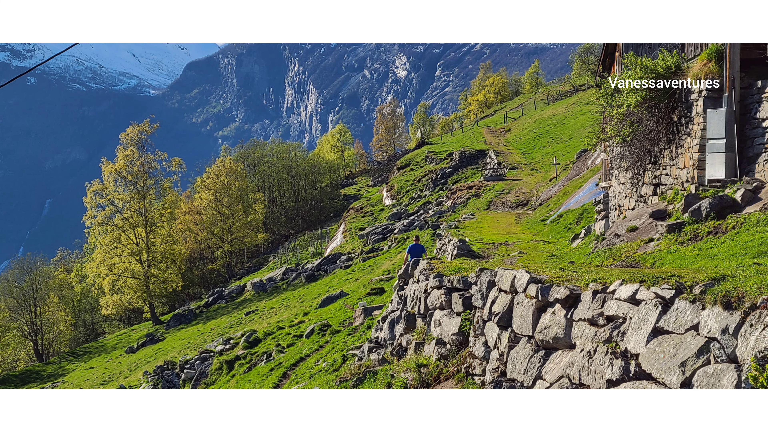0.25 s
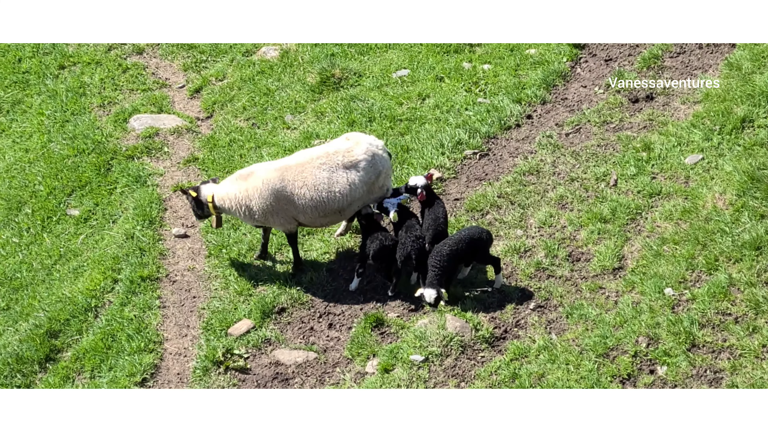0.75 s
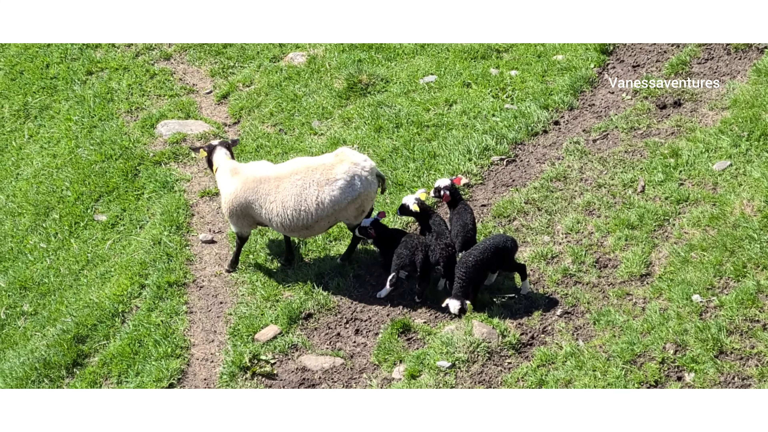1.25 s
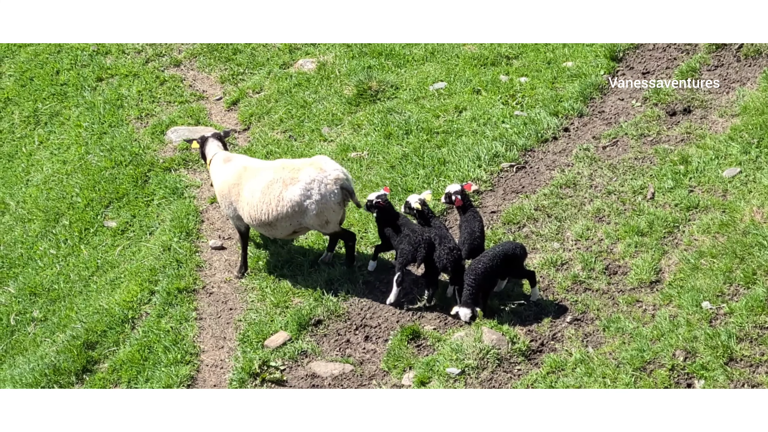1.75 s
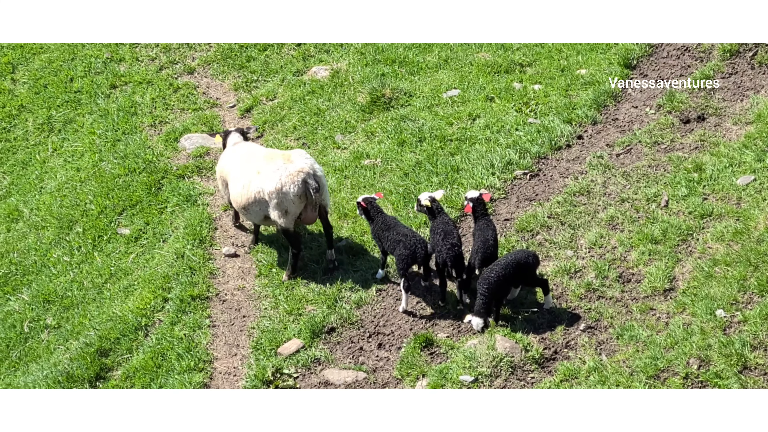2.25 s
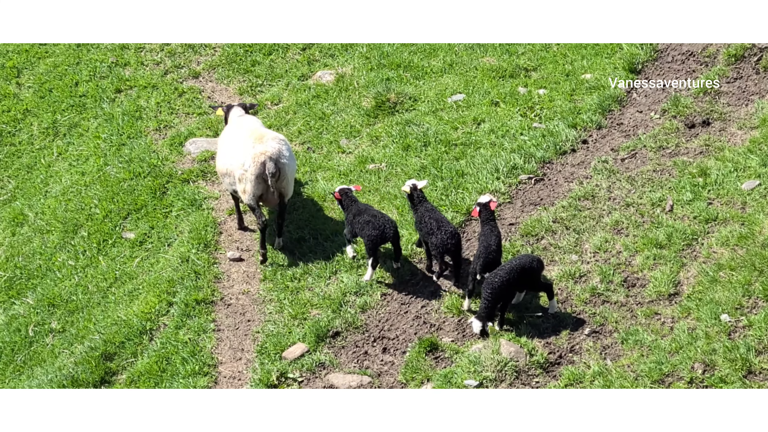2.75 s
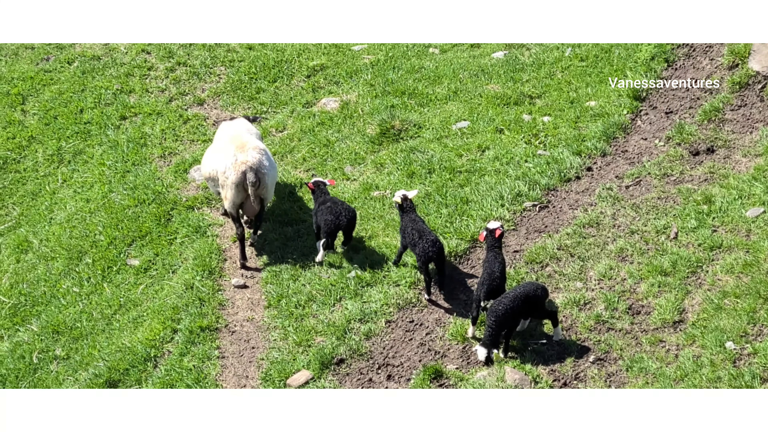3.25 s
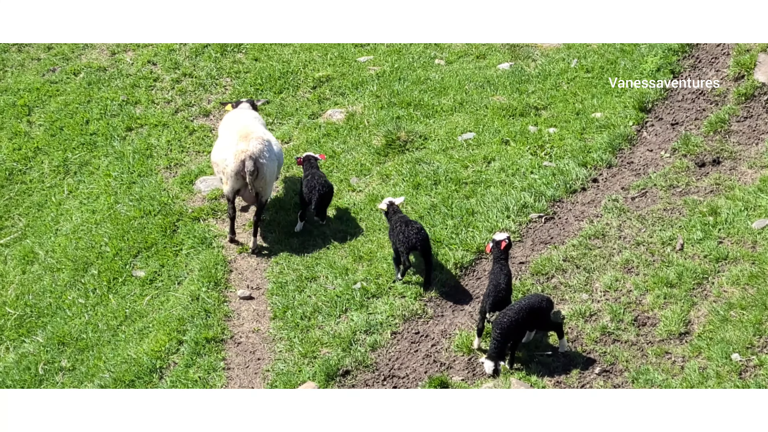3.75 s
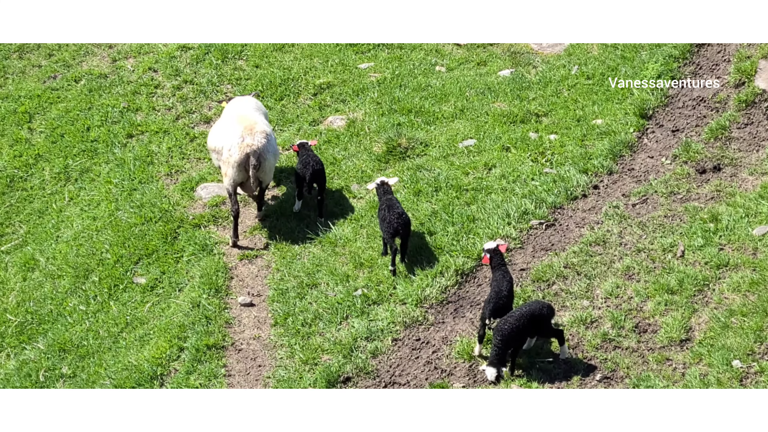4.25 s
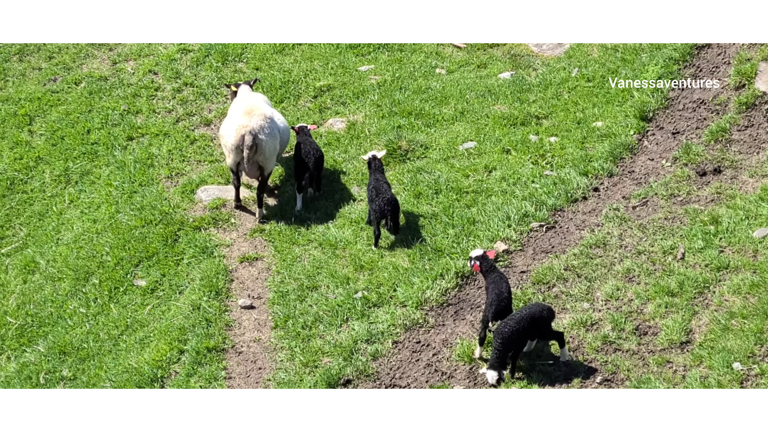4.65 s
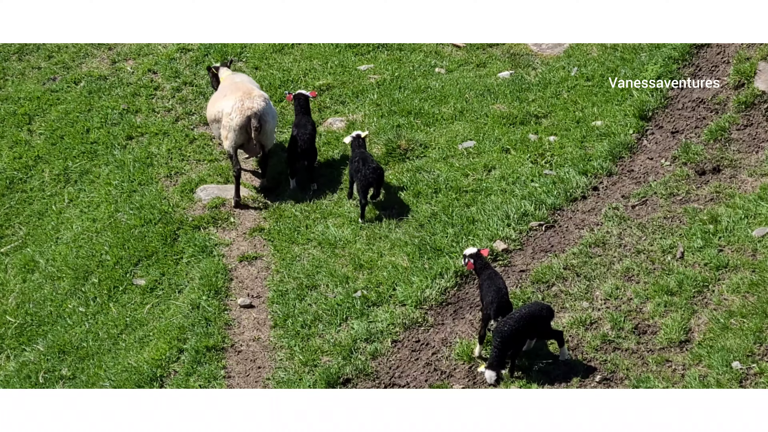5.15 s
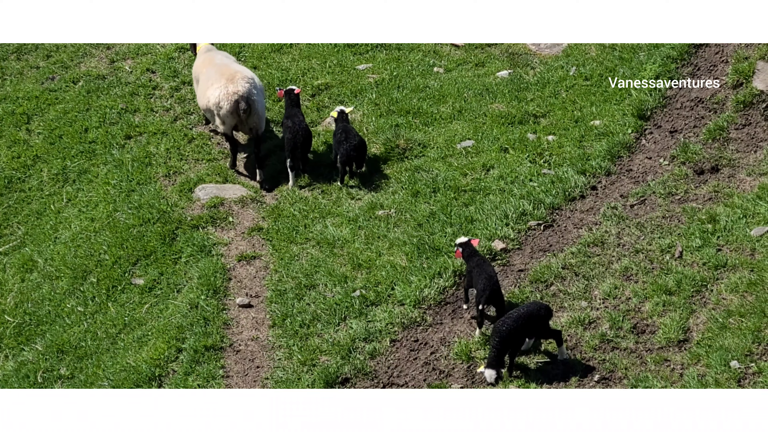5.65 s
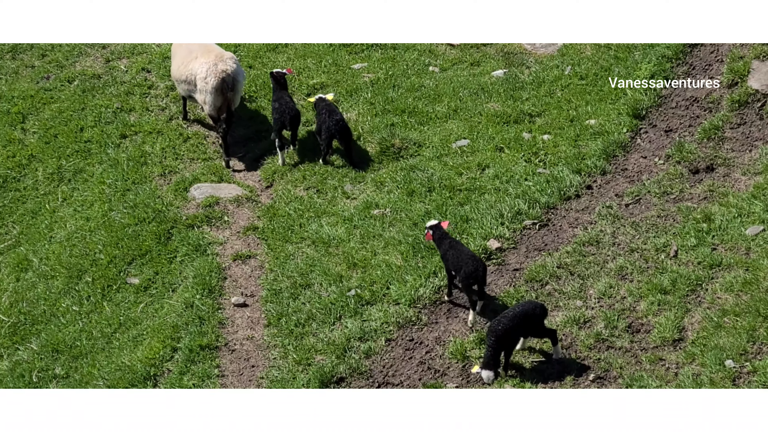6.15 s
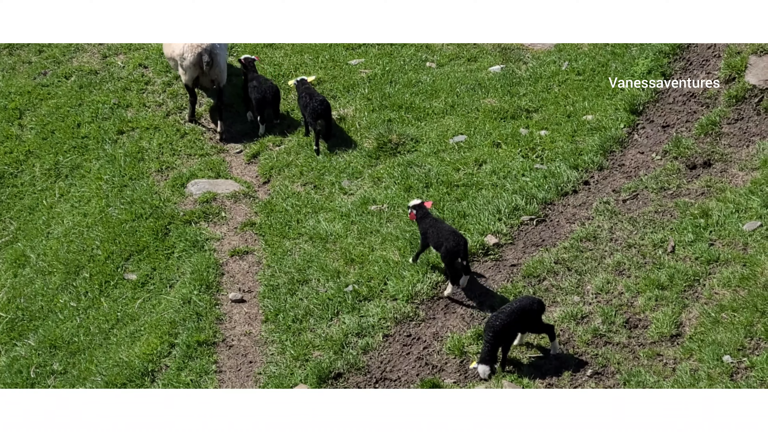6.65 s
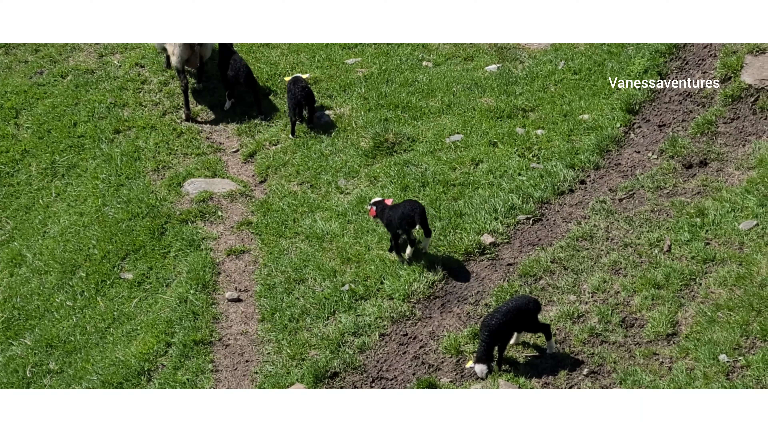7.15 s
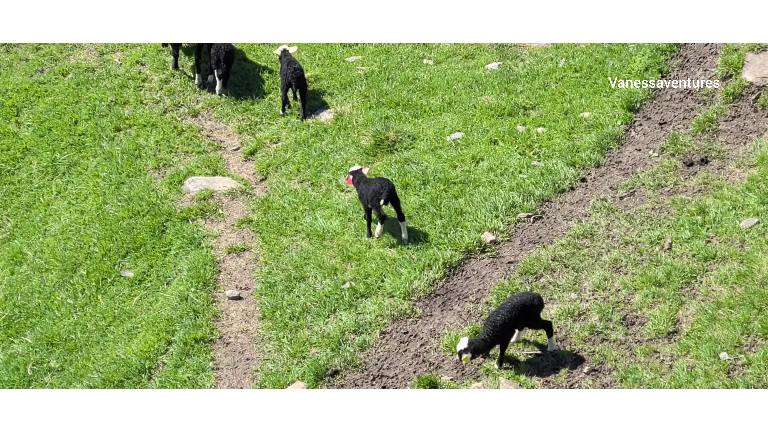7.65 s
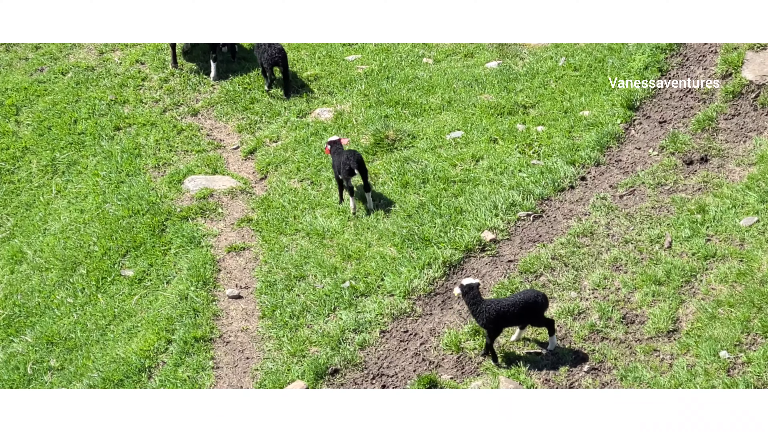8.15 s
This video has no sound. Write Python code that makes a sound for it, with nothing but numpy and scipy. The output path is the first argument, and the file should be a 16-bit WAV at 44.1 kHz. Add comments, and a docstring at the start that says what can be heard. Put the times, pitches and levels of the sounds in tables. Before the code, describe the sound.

Dull, short tin clanks from a walking ewe's collar, uneven in strength, over steady far water, rumbling wind and tiny grass ticks.

```python
"""Mountain pasture: a ewe walks, and the tin bell on her collar clanks at each jolt, as a sum of decaying modes.
Distant falling water roars in the valley, as noise shaped by spectra; a low hum wavers, as narrow-band noise.
Wind buffets the microphones as low noise of uneven strength, and they hiss thinly, as shaped high noise.
Grass ticks and rustles as short puffs of noise. Faint whistles, some perhaps birds, one probably the bell
still ringing, are sines of gliding pitch. The sound is cut in after a short silence."""
import sys
import numpy as np
from scipy import signal
from scipy.fft import rfft, irfft
from scipy.io import wavfile
from scipy.ndimage import uniform_filter1d

SR = 44100
rng = np.random.default_rng(int(sys.argv[2]) if len(sys.argv) > 2 else 0)


def digitize_waveform(pressure):
    """Quantize a signal to 16-bit integers and store it at the path in sys.argv[1].

    Rows of a 2-D input are taken as channels; values are limited to [-1, 1].
    """
    field = np.atleast_2d(pressure).T
    bounded = np.clip(field, -1, 1)
    quanta = np.round(bounded * 32767).astype(np.int16)
    wavfile.write(sys.argv[1], SR, quanta)


N = 370440
SLOW_STEP = 64  # samples between points of a slow curve
START_S, EDGE_HZ = 0.4336, 15850  # end of the opening silence, upper band limit

# Thin hiss of the microphones, relative spectral density: hz, level_db
HISS_SPECTRUM = [(2350, -36.5), (4000, -7.5), (5040, -6.5), (5700, -4), (6820, 4), (7660, -7.5),
                 (8070, -26.5), (8500, -24.5), (10000, -14.5), (12500, -10.5), (15200, -13), (16000, -16.5)]
# Roar of the water, relative spectral density: hz, level_db
ROAR_SPECTRUM = [(53, -38.5), (90, -3.5), (145, -13), (225, -7), (283, -10), (356, -9), (631, -14),
                 (743, -12.5), (1160, -18), (1410, -28), (2080, -25.5), (3090, -39.5), (4500, -51),
                 (5850, -77), (9900, -120)]
# Middle band of the roar that surges, relative spectrum: hz, level_db
SURGE_SPECTRUM = [(300, -60), (600, -18), (1100, 0), (1380, -4), (1640, 1), (1950, -2), (2250, -10),
                  (2700, -8), (3200, -20), (4500, -36), (7000, -90)]
# Swells of that band as the air carries it: peak_s, level_db, rise_and_fall_s
SURGE_SWELLS = [(1.7, -60.5, 0.77), (5.04, -55, 0.2), (5.69, -49, .06), (5.88, -48, .14), (6.55, -59, .25),
                (7.63, -57.5, 0.23)]
ROAR_DB, HISS_DB, CALM_DB = -40.5, -72, -63  # rms levels; the last is the surging band between swells
# Left-right likeness of the roar: hz, likeness (0-1)
ROAR_LIKENESS = [(100, 1), (270, 0.93), (600, 0.55), (1200, 0.49), (2500, 0.51), (4000, 0), (8000, 0.14)]
# Phase by which the left leads in the roar: hz, left_lead_rad
ROAR_LEAD = [(20, -2.5), (780, 1.5), (2410, 6), (4050, 11.5)]
# Left-right level difference of the noise fields: hz, left_over_right_db
FIELD_BALANCE = [(60, 3), (110, -2.5), (200, 1), (380, -2), (700, 0.5), (1290, -2), (2380, -2.5),
                 (4400, -2), (8120, 5.5), (15000, -6.5)]

DRONE_HZ, DRONE_WIDTH_HZ = 86.5, 6  # centre, full width at half amplitude
DRONE_DB, DRONE_LIKENESS = -46.5, 0.8  # rms level, left-right likeness (0-1)

# Wind strength before lumps and gusts: time_s, level_db
WIND_STRENGTH = [(0.44, -46), (0.75, -41), (0.9, -36), (1.4, -35.5), (1.9, -35.5), (2.75, -33), (2.87, -42),
                 (3.1, -36.5), (3.6, -36.5), (3.72, -37.5), (4.2, -33.5), (4.4, -44), (5.1, -41),
                 (5.5, -46.5), (5.8, -42), (6.4, -44), (7.2, -42), (8.4, -46)]
# Pressure swings of the wind, relative spectral density: hz, level_db
WIND_SPECTRUM = [(8.8, -61.5), (15, -11), (43, 1), (70, 4.5), (93, 0), (134, -13.5), (200, -14), (260, -40),
                 (440, -120)]
# Hardest gusts, and one brief dip: peak_s, change_db, rise_and_fall_s, left_over_right_db
WIND_GUSTS = [(1.3, -4, .04, 9), (1.44, 4, 0.044, -3), (1.73, 5, .03, 6), (2.12, 3, 0.047, -0.5),
              (2.32, 4.5, 0.029, -3), (3.56, 7, 0.032, 9), (3.76, 8, .04, 9), (3.96, 6.5, 0.11, 8.5),
              (4.63, 9, .04, 3), (5.1, 5.5, 0.069, 10), (6.6, 11.5, 0.032, 5)]
LUMPS_DB, SLOWEST_LUMP_HZ, FASTEST_LUMP_HZ = 1.5, 0.8, 7.6  # rms depth, range of rates

# Ticks and rustles in the grass: time_s, relative level_db, centre_hz, decay_s
GRASS_RUSTLES = [(0.613, -59, 4600, 0.004), (0.815, -71, 8000, 0.0047), (0.834, -66, 8000, 0.0036),
                 (.901, -65, 11000, .004), (0.981, -58, 11000, 0.0061), (1.075, -65, 12500, .04),
                 (1.146, -63, 11000, 0.0032), (1.907, -74, 12000, .09), (2.36, -66, 12000, 0.071),
                 (2.633, -63, 11000, 0.0019), (2.887, -74, 10000, 0.018), (3.742, -68, 10000, .004),
                 (4.353, -65, 12000, .003), (4.688, -60, 9000, 0.019), (5.445, -69, 4000, .005),
                 (8.2, -76, 4000, 0.009)]

# One longer bird call that arches and drops: time_s, pitch_hz, level_db, breathiness (0-1)
BIRD_CHIRP = [(3.446, 5300, -76, .3), (3.455, 5650, -68, .5), (3.49, 6040, -69, .8), (3.55, 5500, -69, .5),
              (3.57, 4500, -69, .1), (3.6, 3100, -77, .1)]
# Short whistles, some perhaps birds, the one at 6.5 s probably the bell still ringing:
# start_s, length_s, start_hz, middle_hz, end_hz, level_db, breathiness (0-1)
FAINT_WHISTLES = [(3.31, .05, 3040, 3480, 2950, -72, .1), (3.44, .04, 3390, 3420, 3440, -70, .1),
                  (3.478, .028, 3200, 3240, 3360, -70, .1), (3.6, .045, 3380, 3350, 3300, -72, .1),
                  (5.64, .1, 1105, 1070, 1075, -51, .7), (6.5, .26, 2572, 2582, 2575, -63, .03),
                  (6.728, .035, 3180, 3180, 3120, -63, .05), (6.885, .045, 5840, 5878, 5910, -72, .05),
                  (7.028, .04, 5830, 5835, 5860, -76, .03)]
WHISTLE_FADE_S = 0.012  # fade in and fade out

# Blows of the clapper: time_s, lowest_tone_db, upper_tones_db, brightness_db_per_octave, place_round_rim_rad,
# bell_facing_rad, relative clack_db, swing_rad_per_s, fade_time_s
BELL_BLOWS = [(1.5333, -24, 5.7, 4.2, 0.01, 2.22, 5, 2.2, 0.088),
              (1.692, -35.5, 2, -8, 2.97, 4.52, 6, 3, 0.06),
              (2.1229, -16, 3.1, -0.2, 0.56, 4.23, 1, 1.9, 0.055),
              (3.0102, -15.3, 5.6, -0.5, 4.82, 1.39, 2, 0.2, 0.089),
              (3.8905, -20.5, 2.6, -3, 1.0, 5.87, -2, 4.4, 0.132),
              (4.7098, -16, -5.7, 7.4, 3.57, 5.65, -2, -0.8, 0.12),
              (4.8646, -16, -6.7, -1.5, 6.08, 1.21, -5, -0.2, 0.131),
              (5.7524, -14, 1.9, -3.2, 1.35, 4.68, 0, 0.4, 0.092),
              (6.2817, -28, 9.5, -1.5, 0.64, 4.45, 2, -0.5, 0.095),
              (6.6709, -20.5, -4.3, 0.4, 2.2, 1.83, 4, 4.2, 0.138),
              (7.1721, -26.5, -8.1, 3.9, 5.35, 4.93, -4, -0.2, 0.096),
              (7.7224, -18.5, -4.5, -2.3, 2.19, 0.14, 1, -1.0, 0.07),
              (7.8643, -33, -2.8, -3.5, 0.0, 1.99, -2, -0.2, 0.107),
              (8.316, -18.5, 2.6, 2.5, 0.11, 2.03, -2, 0.2, 0.075)]
# Lowest tone of the bell: pitch_hz, swell_s, t60_s, left_over_right_db, left_lead_rad
LOWEST_TONE = (1208, 0.0097, 0.087, 5.4, 1.06)
# Upper tones of the bell: pitch_hz, level_under_lowest_tone_db, t60_s, waves_round_rim, node_phase_rad,
# beams_radiated, null_phase_rad, left_over_right_db, left_lead_rad
UPPER_TONES = [(2083, -21.7, 0.45, 1, 0.3, 1, 0.72, 1.0, -2.8),
               (2565, -25.4, 0.28, 4, 0.48, 1, 0.84, -2.0, -1.4),
               (3009, -23.8, 0.29, 4, 0.78, 4, 0.6, -1.0, -2.3),
               (3165, -29.2, 0.13, 5, 0.6, 1, 0.96, -4.0, -0.3),
               (3243, -24.2, 0.17, 4, 2.58, 5, 0.9, -1.0, -0.1),
               (3461, -36.2, 0.13, 4, 0.3, 3, 1.26, -3.0, 1.3),
               (4040, -27.6, 0.36, 4, 2.7, 3, 1.8, 4.0, 1.1),
               (4217, -24.7, 0.36, 4, 2.28, 5, 0.9, 6.0, -2.0),
               (4605, -27.9, 0.14, 4, 0.54, 4, 0.54, -1.0, -0.2),
               (5122, -36.1, 0.43, 3, 1.38, 1, 0.84, -11.0, -2.6),
               (5275, -22.5, 0.3, 4, 2.0, 1, 2.58, -10.0, -3.0),
               (5469, -36.1, 0.19, 3, 1.02, 4, 2.7, -1.0, -1.0),
               (5908, -31.5, 0.14, 1, 0.06, 1, 0.84, 1.0, -3.0),
               (6285, -30.2, 0.14, 5, 2.04, 3, 0.6, 1.0, -2.9),
               (6675, -27.3, 0.21, 3, 0.24, 3, 1.62, -2.0, -2.1),
               (7027, -30.1, 0.2, 2, 0.12, 2, 3.06, 6.0, -1.4),
               (7205, -37.8, 0.13, 1, 0.06, 1, 1.14, 5.0, -1.9),
               (7307, -41.2, 0.37, 4, 1.26, 1, 0.6, 6.0, -1.8),
               (8072, -46.8, 0.18, 3, 1.56, 2, 2.88, 11.0, -1.2),
               (8610, -43.6, 0.1, 5, 1.2, 5, 1.56, 12.0, 2.0),
               (8941, -29.8, 0.08, 3, 1.74, 3, 1.32, 3.0, 1.7),
               (9275, -35.3, 0.16, 3, 0.84, 5, 1.62, 7.0, 2.7),
               (9671, -33.1, 0.12, 3, 2.58, 3, 3.12, 6.0, 2.4),
               (10004, -31.2, 0.16, 2, 0.72, 1, 3.0, 9.0, 2.9),
               (10405, -37.3, 0.15, 4, 2.76, 1, 2.88, 10.0, -0.1),
               (10680, -36.5, 0.14, 5, 2.88, 1, 2.64, 12.0, -0.6),
               (10909, -34.1, 0.14, 2, 2.76, 3, 0.66, 5.0, -2.4),
               (11614, -42.3, 0.18, 4, 0.42, 4, 0.48, -0.0, 0.7),
               (12160, -30.4, 0.1, 4, 0.48, 4, 0.6, -3.0, 2.1),
               (13549, -39.0, 0.11, 3, 0.48, 1, 0.9, -6.0, -2.8),
               (14591, -43.1, 0.12, 5, 1.14, 2, 3.12, -0.0, -1.3),
               (15382, -36.9, 0.12, 3, 1.56, 3, 0.48, 1.0, -0.1)]
# Noise of the clack, relative spectrum: hz, level_db
CLACK_SPECTRUM = [(2000, -27), (3200, 13), (4500, -17), (7000, 4.5), (9000, -18.5), (12500, -19),
                  (15500, -5)]
# Crowd of close, short tones at the top of the tin, relative strength: hz, level_db
CLATTER_SPECTRUM = [(2800, -47), (3300, -43.5), (5000, -65), (7200, -43), (8300, -50.5), (10000, -55.5),
                    (12300, -43), (14000, -53.5), (15500, -49)]
# Upper tones waver in strength, each at a chance rate: depth, range of rates
WAVER_DB, SLOWEST_WAVER_HZ, FASTEST_WAVER_HZ = 3.5, 8, 40

LEFT_RIGHT = np.array([[0.5], [-0.5]])  # shares a difference equally between the channels


def gain_of(db):
    """Logarithmic level: decibels become an amplitude factor."""
    return 10 ** (np.asarray(db) / 20)


def evened(x):
    """Normalization: scale to a root-mean-square of one."""
    return x / np.sqrt(np.mean(x ** 2) + 1e-20)


def read(points, hz):
    """Interpolation of a spectrum along a logarithmic frequency axis."""
    f, value = np.transpose(points)
    return np.interp(np.log(hz + 1), np.log(f + 1), value)


def add(mix, s, sound):
    """Superposition: add a two-channel sound to the mix at time s."""
    part = mix[:, round(s * SR):][:, :sound.shape[1]]
    part += sound[:, :part.shape[1]]


def coloured(x, spectrum):
    """Linear filtering: multiply the Fourier spectrum by a gain curve."""
    hz = np.fft.rfftfreq(x.shape[-1], 1 / SR)
    return irfft(rfft(x) * gain_of(read(spectrum, hz)), x.shape[-1])


def slow_times():
    """Coarse sampling: the times in seconds at which slow curves are computed."""
    return np.arange(0, N, SLOW_STEP) / SR


def bump(peak_s, width_s):
    """Gaussian envelope: a smooth rise and fall of height one."""
    return np.exp(-((slow_times() - peak_s) / width_s) ** 2)


def filled(slow):
    """Sample and hold: spread a slow curve over every sample."""
    return np.repeat(slow, SLOW_STEP, axis=-1)[..., :N]


def field(size, spectrum, likeness, lead=0, patchy_db=1.0):
    """Partial coherence: two-channel noise, of rms one, from random short-time spectra that share a component."""
    hop = size // 4
    frames = N // hop + 5
    hz = np.fft.rfftfreq(size, 1 / SR)[:, None]
    a, b, c, d, patches = rng.standard_normal((frames, len(hz), 5)).T
    # patches: smooth level changes over frequency, then over time
    patches = uniform_filter1d(patches, size=10, axis=0)
    patches = evened(uniform_filter1d(patches, size=12, axis=1))
    same = np.clip(likeness, 0, 1)
    left, own = a + 1j * b, c + 1j * d
    right = same * left * np.exp(-1j * lead) + np.sqrt(1 - same ** 2) * own
    tilt = gain_of(read(FIELD_BALANCE, hz) / 2)
    cells = np.array([left * tilt, right / tilt]) * gain_of(read(spectrum, hz) + patchy_db * patches)
    return evened(signal.istft(cells, nperseg=size, noverlap=size - hop)[1][:, :N])


def microphone_hiss():
    """Shaped noise, weakly coherent: a thin high hiss, mostly unlike in the two microphones."""
    return gain_of(HISS_DB) * field(512, HISS_SPECTRUM, 0.16, patchy_db=1.5)


def water():
    """Broadband noise: a steady far roar of water and a middle band that surges."""
    hz = np.fft.rfftfreq(1024, 1 / SR)[:, None]
    likeness, lead = read(ROAR_LIKENESS, hz), read(ROAR_LEAD, hz)
    roar = field(1024, ROAR_SPECTRUM, likeness, lead, patchy_db=0.53)
    surge = field(1024, SURGE_SPECTRUM, likeness, lead, patchy_db=1.5)
    surge_level = gain_of(CALM_DB)
    surge_level = surge_level + sum(gain_of(db) * bump(s, width) for s, db, width in SURGE_SWELLS)
    return gain_of(ROAR_DB) * roar + filled(surge_level) * surge


def drone():
    """Narrow-band noise: a very narrow resonance curve turns noise into a hum that wavers."""
    hz = np.fft.rfftfreq(N, 1 / SR)
    shared, own = rng.standard_normal((N, 2)).T
    right = DRONE_LIKENESS * shared + np.sqrt(1 - DRONE_LIKENESS ** 2) * own
    resonance = 1 / (1 + (2 * (hz - DRONE_HZ) / DRONE_WIDTH_HZ) ** 2)
    hum = irfft(rfft(np.array([shared, right])) * resonance, N)
    return gain_of(DRONE_DB) * evened(hum)


def wind():
    """Amplitude-modulated low noise: lumpy pressure swings, partly shared by the two microphones, with gusts."""
    swings = field(4096, WIND_SPECTRUM, 0.31, patchy_db=2.06)
    t = slow_times()
    rate = np.geomspace(SLOWEST_LUMP_HZ, FASTEST_LUMP_HZ, 24)[:, None]
    turn = rng.random((2, 24, 1))
    # slower lumps are the stronger ones, and each channel has its own phases
    lumps = evened((np.sin(2 * np.pi * (rate * t + turn)) / np.sqrt(rate)).sum(1))
    db = np.interp(t, *np.transpose(WIND_STRENGTH)) + LUMPS_DB * lumps
    for s, gust_db, width, pan_db in WIND_GUSTS:
        db = db + (gust_db + LEFT_RIGHT * pan_db) * bump(s, width)
    return swings * filled(gain_of(db))


def rustle(db, hz, decay):
    """Impulsive friction noise: a short broad puff as blades snap or brush."""
    t = np.arange(SR // 6) / SR
    band = [(hz / 4.6, -15), (hz, 0), (hz * 4.1, -5)]  # hz, relative level_db
    puff = evened(coloured(rng.standard_normal((2, len(t))), band))
    envelope = (1 - np.exp(-5 * t / decay)) * np.exp(-(t / decay) ** 2)
    return gain_of(db + 0.5) * puff * envelope


def arch(s, length, start_hz, middle_hz, end_hz, db, breathy):
    """Piecewise-linear glide: a short whistle passes three pitches at one strength."""
    glide = ((0, start_hz), (0.5, middle_hz), (1, end_hz))
    return [(s + part * length, hz, db, breathy) for part, hz in glide]


def whistle(rows):
    """Frequency modulation: a sine whose pitch is shaken by noise as it grows breathy."""
    s, *columns = np.transpose(rows)
    t = np.arange(s[0], s[-1], 1 / SR)
    hz, db, breathy = (np.interp(t, s, c) for c in columns)
    shake = evened(uniform_filter1d(rng.standard_normal((2, len(t))), size=60))
    pitch = hz * (1 + 0.061 * breathy * shake)
    tone = np.sin(2 * np.pi * np.cumsum(pitch, axis=1) / SR)
    fades = signal.windows.tukey(len(t), min(1, WHISTLE_FADE_S * 2 / (s[-1] - s[0])))
    return np.sqrt(2) * gain_of(db) * tone * fades  # a sine's peak is root two times its rms


def lobes(count, angle, phase):
    """Standing wave: strength of a pattern of lobes at an angle, never quite nil."""
    return np.sqrt(np.cos(count * angle + phase) ** 2 + 0.01)


def lowest_tone(t):
    """Resonant build-up: the tone swells as the air in the mouth of the bell takes it up, then decays."""
    hz, swell, t60, pan_db, lead = LOWEST_TONE
    ring = (1 - np.exp(-t / swell)) * gain_of(-60 * t / t60)
    balance = gain_of(LEFT_RIGHT * pan_db) / gain_of(pan_db / 2)  # left at full level
    return balance * ring / ring.max() * np.sin(2 * np.pi * hz * t + lead * LEFT_RIGHT)


def upper_tones(t, upper_db, bright_db, place, facing, swing, fade_s):
    """Modal excitation and directivity: the place of the blow and the turn of the bell weight each decaying mode."""
    hz, tone_db, t60, waves, node, beams, null, pan_db, lead = np.transpose(UPPER_TONES)[:, :, None]
    # a tone is weak when struck near its node, or when a null of its beams points at the microphones
    share = lobes(waves, place, node) * lobes(beams, facing + swing * t, null)
    level = share * gain_of(tone_db + upper_db + bright_db * np.log2(hz / 4000) - 60 * t / t60)
    level *= np.exp(-(t / fade_s) ** 2)  # the ringing holds, then drops away ever faster
    rate, start = rng.random((len(UPPER_TONES), 2)).T[:, :, None]
    waver_hz = np.interp(rate, (0, 1), (SLOWEST_WAVER_HZ, FASTEST_WAVER_HZ))
    level *= gain_of(WAVER_DB * np.sin(2 * np.pi * (waver_hz * t + start)))
    turn = 2 * np.pi * (hz * t + rng.random((len(UPPER_TONES), 1)))
    return np.array([(level * gain_of(sign * pan_db) * np.sin(turn + sign * lead)).sum(0)
                     for sign in (0.5, -0.5)])


def clatter(t, db, count=70):
    """High modal density: many short tones of chance pitch and strength, unlike at the two microphones."""
    place, size, left, right, pan = rng.random((count, 5)).T[:, :, None]
    hz = 2800 + 12900 * place
    fade = np.hanning(2 * len(t))[len(t):]
    ring = gain_of(read(CLATTER_SPECTRUM, hz) + db - 28 * size - 60 * t / 0.25) * fade
    return np.array([(ring * lean * np.sin(2 * np.pi * (hz * t + turn))).sum(0)
                     for turn, lean in ((left, pan), (right, 1 - pan))])


def clank(db, upper_db, bright_db, place, facing, clack_db, swing, fade_s):
    """Impact excitation: one blow sounds the lowest tone, the upper tones, a noisy clack and a clatter."""
    t = np.arange(SR // 5) / SR
    onset = 1 - np.exp(-t / 0.0026)
    out = lowest_tone(t)
    out += onset * upper_tones(t, upper_db, bright_db, place, facing, swing, fade_s)
    clack = evened(coloured(rng.standard_normal((2, len(t))), CLACK_SPECTRUM))
    out += onset * clack * gain_of(clack_db - 24.5 - 60 * t / 0.058)
    short = 5000  # samples of clatter
    out[:, :short] += onset[:short] * clatter(t[:short], upper_db + 0.91 * bright_db + 8)
    return gain_of(db) * out


def scene():
    """Superposition of sources: hiss, water, hum and wind, with the grass, the whistles and the bell on top."""
    mix = microphone_hiss() + water() + drone() + wind()
    for s, *row in GRASS_RUSTLES:
        add(mix, s - 0.002, rustle(*row))
    for rows in [BIRD_CHIRP] + [arch(*row) for row in FAINT_WHISTLES]:
        add(mix, rows[0][0], whistle(rows))
    for s, *blow in BELL_BLOWS:
        add(mix, s, clank(*blow))
    return mix


def record(dry):
    """Gating and low-pass filtering: silence until the cut, then the band limit."""
    cut = dry * (np.arange(N) >= START_S * SR)
    low_pass = signal.firwin(511, EDGE_HZ, window=("kaiser", 9), fs=SR)
    return signal.oaconvolve(cut, low_pass[None], "same")


dry = scene()
out = record(dry)
digitize_waveform(out)
```